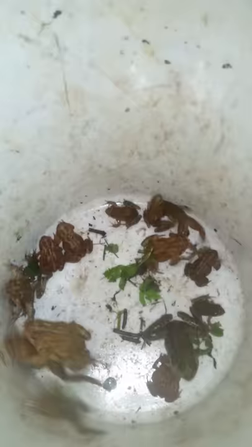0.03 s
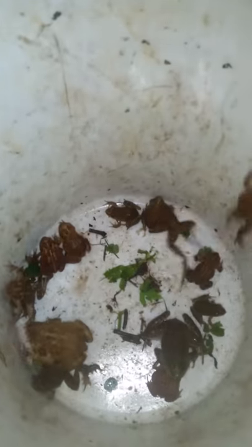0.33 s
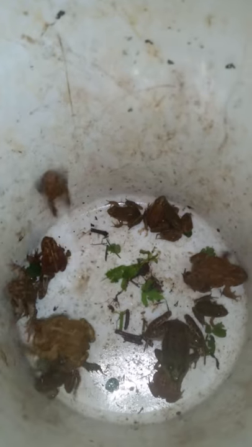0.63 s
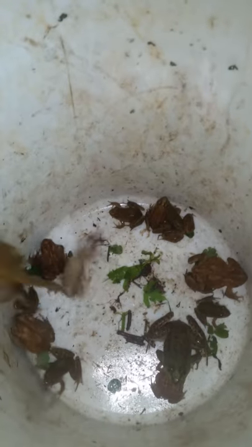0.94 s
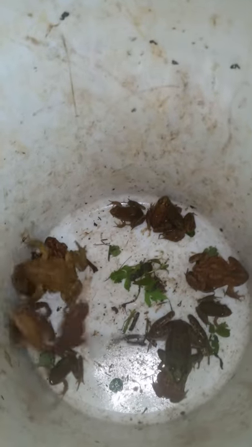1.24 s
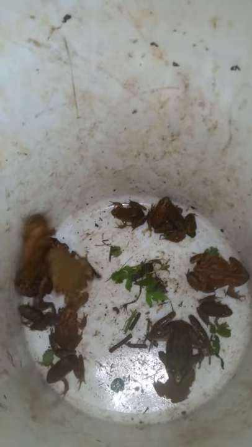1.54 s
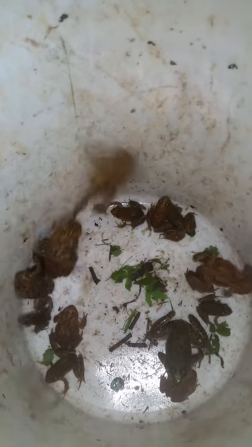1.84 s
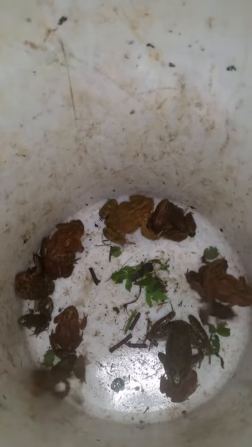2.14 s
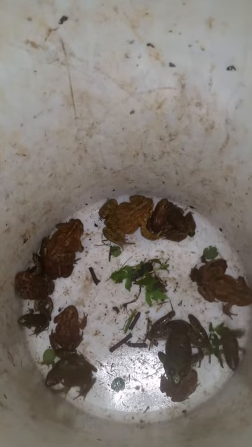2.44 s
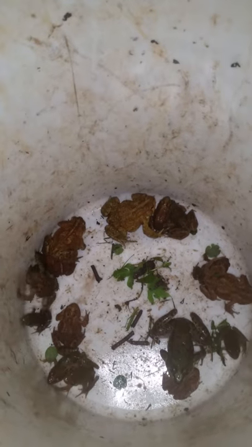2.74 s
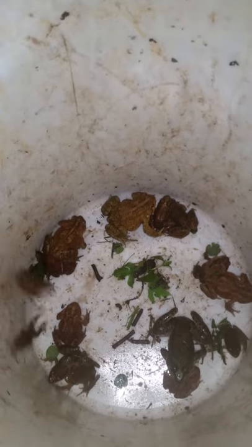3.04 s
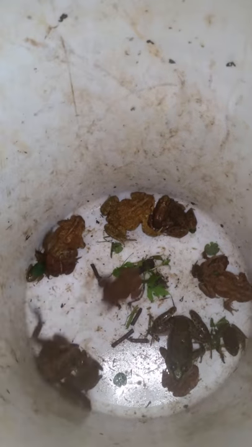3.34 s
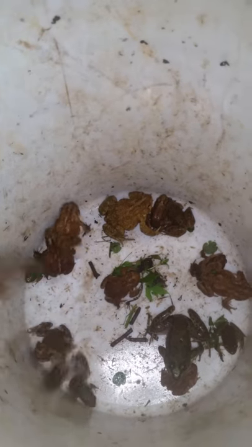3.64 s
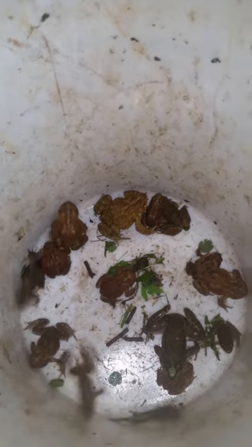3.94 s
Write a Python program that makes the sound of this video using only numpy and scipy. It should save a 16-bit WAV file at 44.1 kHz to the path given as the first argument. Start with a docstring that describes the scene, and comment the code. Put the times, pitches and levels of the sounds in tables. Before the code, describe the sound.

Frogs leap inside a plastic bucket, heard from just above the rim, starting at about 0.5 seconds as faint crickets and outdoor rumble fade in. Hollow thumps, wet slaps and scrabbling feet cluster around 1 second. One frog gives a short falling peep at 1.5, and a sharp knock lands near 2. A faint dry rasp follows from 2.5 to 3, then more thumps around 3.3 and light scuffs.

```python
"""Crickets and outdoor rumble fade in after a short silence; then frogs leap about in a plastic bucket.
Heard from just above the rim, each landing drives the low modes of the base into a boom.
Wet bodies strike the wall and excite its higher modes, and scrabbling feet hiss by stick-slip friction.
Grit ticks on the plastic, one frog gives a falling peep, and a faint dry rasp follows a second later."""
import sys
import numpy as np
from scipy import signal
from scipy.fft import rfft, irfft
from scipy.io import wavfile
from scipy.ndimage import uniform_filter1d

SR = 44100
rng = np.random.default_rng(int(sys.argv[2]) if len(sys.argv) > 2 else 0)


def store_pcm(level_fs):
    """Save levels as 16-bit WAV."""
    pcm = np.round(np.clip(level_fs, -1, 1) * 32767).astype(np.int16)
    wavfile.write(sys.argv[1], SR, np.atleast_2d(pcm).T)


N = 176400
T = np.arange(N) / SR
TAIL = T[:SR // 2]  # time axis of a single event, t/s


def undb(db):
    """Amplitude ratio of a level in decibels."""
    return 10 ** (np.asarray(db) / 20)


def unit(x):
    """Normalisation to a mean energy of one per channel."""
    return x / np.sqrt(np.mean(np.sum(x ** 2, axis=-1)))


def level(x, db, seconds):
    """Energy is power times duration: x gets that of a sound of this rms level and length."""
    return unit(x) * undb(db) * np.sqrt(seconds * SR)


def pan(x, right_db):
    """Direction by level difference: the right channel gains right_db over the left."""
    return x * undb(np.array([[-right_db], [right_db]]) / 2)


def fall(t60):
    """Exponential decay of 60 dB in t60 seconds."""
    return np.exp(-np.log(1000) * TAIL / t60)


def through(x, response):
    """Linear filtering: convolution with an impulse response, cut to the length of x."""
    return signal.fftconvolve(np.atleast_2d(x), np.atleast_2d(response), axes=-1)[:, :x.shape[-1]]


def add(out, start, x):
    """Superposition of x on out from the start time in seconds."""
    i = int(start * SR)
    out[:, i:i + x.shape[-1]] += x[..., :N - i]


def colour(points, size=4096):
    """Minimum-phase impulse response of a spectrum (f/Hz, level/dB), by folding the cepstrum."""
    hz, db = np.array(points).T
    gain = undb(np.interp(np.log(np.fft.rfftfreq(size, 1 / SR) + 1), np.log(hz), db))
    cepstrum = irfft(np.log(gain))
    cepstrum[1:size // 2] *= 2
    cepstrum[size // 2 + 1:] = 0
    return unit(irfft(np.exp(rfft(cepstrum))))


def drift(rate_hz):
    """Low-pass noise: random values joined by straight lines, with a spread near 1."""
    hold = int(SR / rate_hz)
    return uniform_filter1d(np.repeat(rng.standard_normal(N // hold + 1), hold), hold)[:N]


def scatter(t60):
    """A diffuse field: dense decaying reflections, uncorrelated between the microphones."""
    return unit(rng.standard_normal((2, len(TAIL))) * fall(t60))


def crickets(count=9, glide=1.1, wander=.8):
    """Amplitude modulation: distant trills of falling tone pulses, smeared by outdoor reflections."""
    # cricket groups: carrier f/Hz, spread f/Hz, mean pulse rate/Hz, level/dB, right minus left/dB
    groups = [(2780, 135, 45, -43, 9.5), (3107, 74, 60, -49.5, 6), (5600, 260, 50, -52, -1)]
    out = 0
    for hz, spread, rate, db, right_db in groups:
        chorus = 0
        for detune in np.linspace(-1, 1, count):  # detune, glide and wander are in units of the spread
            pulse_hz = rate * (rng.uniform(.7, 1.3) + 0.0514 * drift(5))
            stroke = (np.cumsum(pulse_hz) / SR) % 1
            pitch = hz + spread * (detune + glide * (.5 - stroke) + wander * drift(60))
            pulses = np.exp(-detune ** 2 / 2) * np.sin(np.pi * stroke) ** 2
            chorus = chorus + pulses * np.sin(2 * np.pi * np.cumsum(pitch) / SR)
        sides = np.array([chorus, np.roll(chorus, SR // 2)])  # the shift decorrelates the channels
        arrivals = 1. * (TAIL == 0) + undb(-9) * scatter(t60=.12)
        heard = level(through(sides, arrivals), db, N / SR)
        out = out + pan(heard, right_db) * undb(1.5 * drift(3.99))
    return out


def air(coherent_below_hz=840):
    """Filtered noise: outdoor rumble and hiss coloured by the bucket, the bass alike on both sides."""
    # background spectrum: f/Hz, relative level/dB
    spectrum = [(25, -23), (50, -7), (90, 5.5), (150, 1.5), (205, 3), (300, -8), (420, -4.5), (560, -14),
                (820, -10), (1200, -17), (2100, -13), (2700, -10), (3700, -20), (5000, -17.5), (5700, -14),
                (6800, -19), (8500, -36.5), (11000, -44), (16000, -42)]
    mid, side = rng.standard_normal((2, N))
    side = signal.sosfilt(signal.butter(1, coherent_below_hz, "high", fs=SR, output="sos"), side)
    heard = through(np.array([mid + side, mid - side]), colour(spectrum))
    return pan(level(heard, db=-45, seconds=N / SR), right_db=4) * undb(3.86 * drift(7))


def top_hiss(band_hz=(8000, 15000)):
    """Band-limited noise: a very faint high hiss that comes and goes."""
    # hiss envelope: t/s, level/dB
    envelope = [(0.5, -97), (1.05, -65), (1.4, -75), (1.55, -68), (1.9, -69), (2.3, -80), (2.42, -69),
                (2.6, -90), (3.25, -81), (3.4, -69.5), (4.0, -64)]
    times, db = np.array(envelope).T
    band = signal.butter(2, band_hz, "band", fs=SR, output="sos")
    noise = signal.sosfilt(band, rng.standard_normal((2, N)))
    return level(noise, 0, N / SR) * undb(np.interp(T, times, db))


def base_thumps(low_cut_hz=55):
    """Forced vibration: a soft landing booms the base like a slack drum, radiating little deep bass."""
    # modes of the base: f/Hz, relative level/dB, T60/s
    modes = [(116, -8.5, 0.27), (148.5, -6, 0.14), (176, -6.5, 0.26), (206.7, 7.5, 0.21),
             (218.9, -0.5, 0.36), (427, 2, 0.097)]
    # landings: t/s, level/dB, push duration/ms
    landings = [(0.469, -39, 4.5), (0.758, -41.5, 4.8), (0.83, -43, 2.6), (0.908, -34.5, 3.2),
                (0.915, -54, 4.4), (0.929, -26, 5.5), (0.989, -35.5, 3.8), (1.003, -28, 5.7),
                (1.074, -22, 3.2), (1.255, -36, 2.8), (1.276, -35.5, 4), (1.635, -33.5, 1.9),
                (1.724, -38, 2.9), (1.951, -34.5, 4.1), (1.983, -34.5, 5.2), (2.063, -33.5, 2.9),
                (2.21, -40, 2.6), (2.364, -51, 2.3), (3.090, -36, 2.6), (3.223, -46, 4.6),
                (3.3244, -24, 3.6), (3.366, -30, 4.8), (3.946, -38, 6.1)]
    out = np.zeros((2, N))
    base = sum(undb(db) * fall(t60) * np.cos(2 * np.pi * hz * TAIL) for hz, db, t60 in modes)
    base = signal.sosfilt(signal.butter(1, low_cut_hz, "high", fs=SR, output="sos"), base)
    for start, db, push_ms in landings:
        push = np.sin(np.pi * np.minimum(TAIL * 1000 / push_ms, 1)) ** 2
        add(out, start, level(through(-base, push), db, seconds=.02))
    return out


def wall_ring(strike_spread_db=5.5, detune=0.0087, hz_per_radian=1500):
    """Modal superposition: the point of impact, drawn at random, weights each mode of the wall."""
    # modes of the wall and the enclosed air: f/Hz, relative level/dB, T60/s
    modes = [(557, 2, 0.04), (616.4, -2.5, 0.13), (784, -1.5, 0.21), (858, -3, 0.076), (921, 5.5, 0.095),
             (1296, -3, 0.14), (1718, 2, 0.072), (2033, -2.5, .11), (2280, 1.5, 0.064), (2783, 14, 0.097),
             (4380, 15.5, 0.079), (6692, -10, .08)]
    apart = np.array([[-.5], [.5]]) / hz_per_radian  # higher modes reach the microphones out of step
    ring = 0
    for (hz, db, t60), (spot, load) in zip(modes, rng.standard_normal((len(modes), 2))):
        phase = 2 * np.pi * hz * (1 + detune * load) * TAIL + apart * hz
        ring = ring + undb(db + strike_spread_db * spot) * fall(t60) * np.cos(phase)
    return unit(ring)


def wall_slaps():
    """Impact excitation: a longer contact rings the wall more dully; wet skin adds a bright smack."""
    # bodies and feet striking the wall: t/s, knock level/dB, contact time/ms, smack level/dB
    strikes = [(0.479, -45.5, 0.45, -37.5), (0.585, -35.5, 0.1, -41), (0.770, -40.5, 1, -46),
               (0.883, -27.5, 0.78, -56), (0.924, -32, 1.4, -55), (0.969, -26.5, 0.44, -28),
               (0.995, -29.5, .6, -38), (1.004, -35, 0.49, -37), (1.032, -28.5, 0.59, -38.5),
               (1.063, -32, 0.89, -52), (1.075, -23, 1.05, -40), (1.082, -33, 0.79, -54),
               (1.102, -34.5, 0.8, -38), (1.280, -40, .6, -60), (1.309, -35, 0.37, -44),
               (1.461, -39, 0.38, -38.5), (1.615, -41, 0.29, -50), (1.635, -27, 0.54, -35.5),
               (1.660, -35, 0.56, -52), (1.736, -35, 0.14, -46), (1.950, -31.5, 0.45, -55),
               (1.9565, -37, 0.34, -54), (1.9637, -19, 0.15, -38), (1.972, -35, 0.17, -39),
               (1.988, -56, 0.31, -45), (2.057, -36.5, .45, -39), (2.073, -32.5, 0.36, -38),
               (2.088, -38.5, 1.1, -58), (2.201, -40, 0.48, -44), (2.245, -50, 0.3, -49),
               (2.388, -37.5, 0.62, -46), (2.901, -41, 0.38, -42), (3.238, -53, .25, -40.5),
               (3.312, -45, 0.44, -56), (3.366, -32, .8, -57), (3.394, -44, 0.66, -57),
               (3.716, -39.5, 0.093, -40)]
    # spectrum of the plastic's knock: f/Hz, relative level/dB
    knock_spectrum = [(150, -29.5), (330, -4), (520, 1), (950, 2), (1500, -2), (2300, 2), (3000, -13),
                      (3700, -38), (6500, -37), (8500, -69), (16000, -54)]
    # spectrum of the wet smack: f/Hz, relative level/dB
    smack_spectrum = [(800, -30), (2000, 8.5), (2900, 15.5), (3600, 5.5), (5500, 4.5), (6800, 0.5),
                      (8300, -28), (10000, -28.5), (16000, -21)]
    out = np.zeros((2, N))
    plastic, skin = colour(knock_spectrum), colour(smack_spectrum)
    click = 1. * (TAIL == 0)
    for start, knock_db, contact_ms, smack_db in strikes:
        age = TAIL * 1000 * np.pi / contact_ms
        force_slope = np.diff(age ** 2 * np.exp(-1.3 * age), append=0)
        bucket = click + undb(-1.5) * wall_ring() + undb(6.5) * scatter(t60=0.067)
        knock = through(through(bucket, plastic), force_slope)
        smack = through(0.37 * click + scatter(t60=0.04), skin)
        add(out, start, pan(level(knock, knock_db, seconds=.01), right_db=5))
        add(out, start, pan(level(smack, smack_db, seconds=.01), right_db=5.5))
    return out


def foot_scuffs(grains_per_s=600, grain_spread_db=3.5, grain_t60=0.026):
    """Stick-slip friction: toes release showers of tiny noise bursts that hiss and ring the wall."""
    # feet sliding on the plastic: t/s, duration/s, rub level/dB, hiss level/dB
    slides = [(0.62, 0.13, -47, -49.5), (0.75, 0.12, -42.5, -44.5), (0.89, 0.28, -40.5, -45),
              (1.23, 0.095, -42.5, -45.5), (1.35, 0.022, -42, -51), (1.49, 0.16, -43, -42.5),
              (1.71, 0.067, -41.5, -48), (1.81, .11, -39, -39.5), (1.95, .05, -39, -36),
              (2.05, 0.084, -45.5, -46), (2.37, 0.068, -49, -47.5), (2.54, 0.13, -47, -48),
              (2.60, 0.47, -59.5, -51.5), (2.86, 0.051, -44, -48), (3.05, 0.048, -45, -45.5),
              (3.22, 0.045, -61, -47.5), (3.35, 0.07, -47.5, -48), (3.66, 0.064, -42.5, -42.5),
              (3.79, 0.078, -49, -51), (3.94, 0.056, -42.5, -40.5)]
    # spectrum of the rubbed wall: f/Hz, relative level/dB
    rub_spectrum = [(200, -1.5), (480, -8.5), (700, 2), (860, -1), (1100, -1.5), (1800, 5.5), (2500, 1.5),
                    (3500, 9), (8000, -59.5)]
    # spectrum of the friction hiss: f/Hz, relative level/dB
    hiss_spectrum = [(1200, -8.5), (2400, 5), (3600, 3.5), (4300, -1), (4800, -1), (5700, -2.5),
                     (6800, -1.5), (8200, -16.5), (10000, -26.5), (16000, -26)]
    out = np.zeros((2, N))
    rub, hiss = colour(rub_spectrum), colour(hiss_spectrum)
    for start, length, rub_db, hiss_db in slides:
        progress = TAIL / length
        press = np.clip(np.minimum(progress / 0.13, (1 - progress) / 0.21), 0, 1)  # attack, release
        chance, size = rng.random((2, len(TAIL)))
        grains = press * (chance < grains_per_s / SR) * undb(-grain_spread_db * np.log(size + 0.0078))
        power = np.abs(through(grains ** 2, fall(grain_t60) ** 2))  # incoherent bursts add in power
        friction = np.sqrt(power) * rng.standard_normal((2, len(TAIL)))
        rubbed = through(friction + undb(-6) * through(friction[0], wall_ring()), rub)
        add(out, start, pan(level(rubbed, rub_db, length), right_db=4.5))
        add(out, start, pan(level(through(friction, hiss), hiss_db, length), right_db=1.5))
    return out


def grit_ticks():
    """Brief impacts radiate high frequencies: bits of grit flick against the plastic."""
    # grit impacts: t/s, level/dB
    impacts = [(1.496, -59), (1.846, -59), (2.373, -58), (3.821, -47.5)]
    # spectrum of a tick: f/Hz, relative level/dB
    spectrum = [(3000, -20), (6000, 3), (9000, -1), (12000, -5), (16000, -21)]
    out = np.zeros((2, N))
    for start, db in impacts:
        add(out, start, level(through(scatter(t60=0.026), colour(spectrum)), db, seconds=.01))
    return out


def frog_peep(start=1.520, rise_s=.0065, sag_s=0.03):
    """Frequency modulation: jitter roughens a falling squeak; the bucket rings, a low rasp trails off."""
    start_hz, end_hz, ring_hz, trail_hz = 1316, 1090, 1277, 920
    out = np.zeros((2, N))
    age = TAIL / rise_s
    jitter, flutter = drift(650)[:len(TAIL)], drift(380)[:len(TAIL)]
    hz = (end_hz + (start_hz - end_hz) * np.exp(-TAIL / sag_s)) * (1 + 0.049 * jitter)
    voice = (age * np.exp(1 - age)) ** 3 * np.sin(2 * np.pi * np.cumsum(hz) / SR)
    onset = np.minimum(age / 2, 1) ** 2
    ring = onset * fall(t60=0.099) * np.sin(2 * np.pi * ring_hz * TAIL)
    trail = onset * flutter * np.exp(-(TAIL / 0.13) ** 4) * np.sin(2 * np.pi * trail_hz * TAIL)
    peep = voice + undb(-0.5) * ring + undb(-20.5) * trail
    add(out, start, pan(undb(-20) * peep, right_db=10))
    return out


def dry_rasp(start=2.54, length=.44, relative_rise_per_s=0.054):
    """Narrow-band noise: slightly rising resonances rasp faintly, like skin sliding down the wall."""
    # resonances: centre f/Hz, width/Hz, relative level/dB
    resonances = [(2350, 320, -1.5), (2580, 280, 0), (4220, 760, -3.5), (4370, 200, -8)]
    out = np.zeros((2, N))
    age = T - start
    swell = np.sin(np.pi * np.clip(age / length, 0, 1)).clip(0) ** .5
    for hz, width, db in resonances:
        phase = 2 * np.pi * np.cumsum(hz * (1 + relative_rise_per_s * (age - length / 2))) / SR
        for channel in out:
            channel += undb(db) * (drift(width) * np.sin(phase) + drift(width) * np.cos(phase))
    return pan(level(out * swell, db=-45.5, seconds=length), right_db=4)


def scene():
    """Sound pressures add: the frogs in their bucket over the outdoor background."""
    bucket = base_thumps() + wall_slaps() + foot_scuffs() + dry_rasp() + grit_ticks() + frog_peep()
    return bucket + crickets() + air() + top_hiss()


def record(dry, cutoff_hz=15850):
    """Gain and band limiting: the sound fades in from silence and a steep low-pass cuts the top."""
    # opening fade: t/s, gain/dB
    fade = [(0.405, -91), (0.42, -19.5), (0.47, -10), (0.55, -5.5), (0.62, -1), (0.75, 0.5)]
    times, db = np.array(fade).T
    opened = dry * undb(np.interp(T, times, db)) * (T > times[0])
    return signal.sosfilt(signal.ellip(10, .2, 80, cutoff_hz, fs=SR, output="sos"), opened)


dry = scene()
out = record(dry)
store_pcm(out)
```